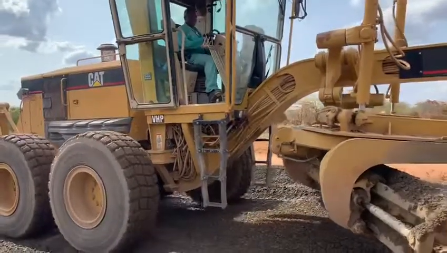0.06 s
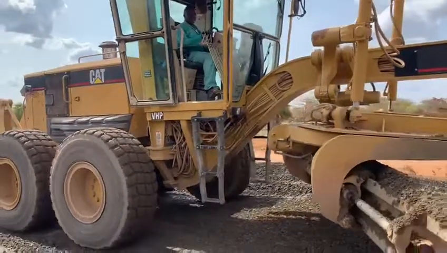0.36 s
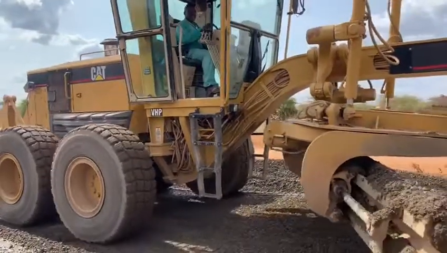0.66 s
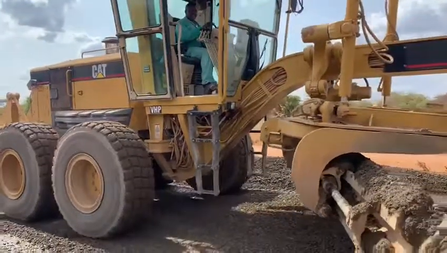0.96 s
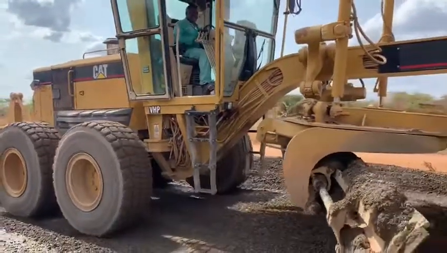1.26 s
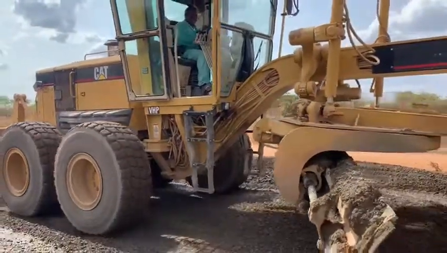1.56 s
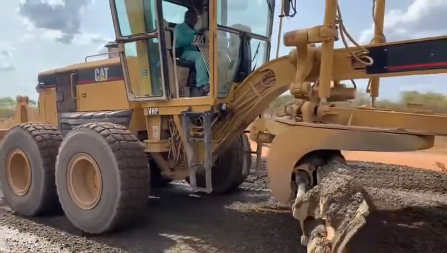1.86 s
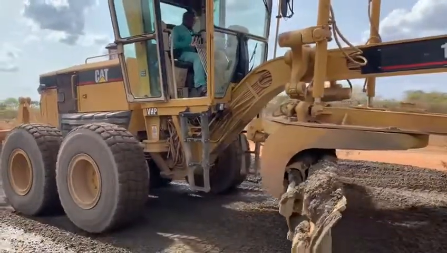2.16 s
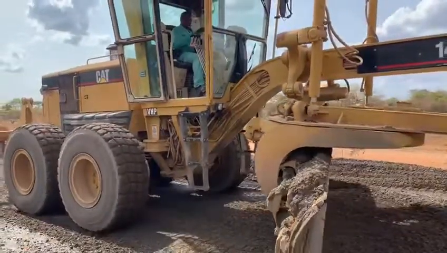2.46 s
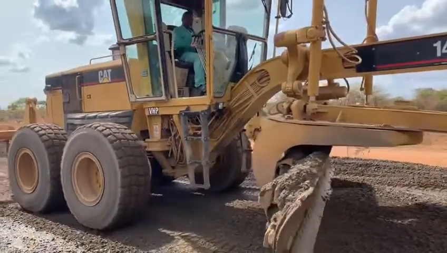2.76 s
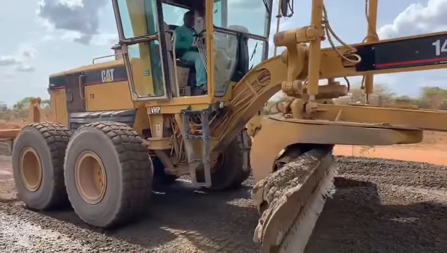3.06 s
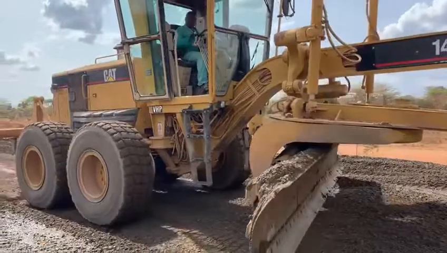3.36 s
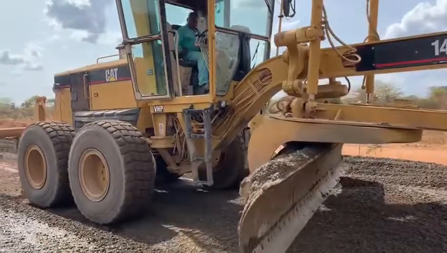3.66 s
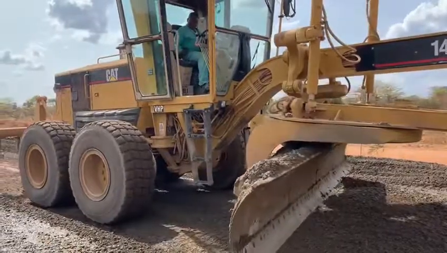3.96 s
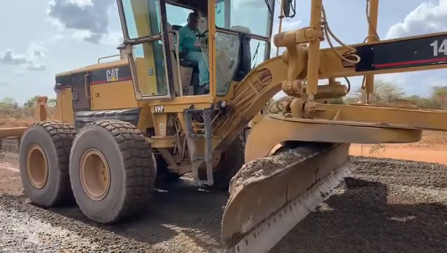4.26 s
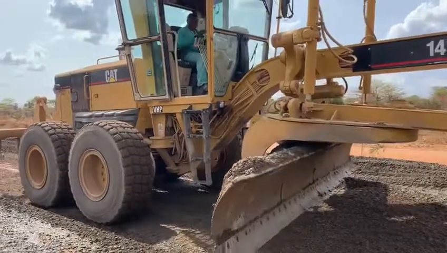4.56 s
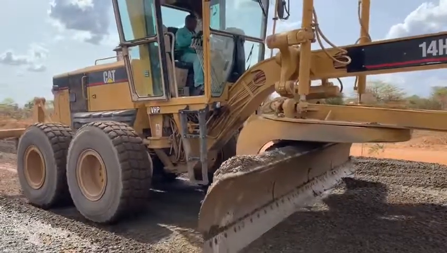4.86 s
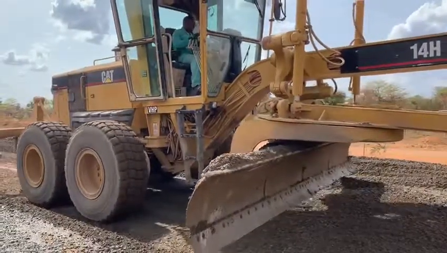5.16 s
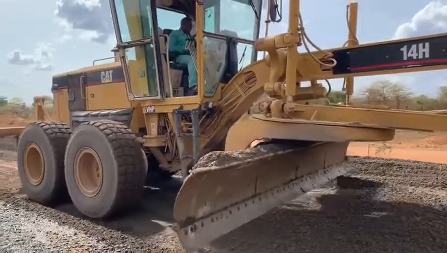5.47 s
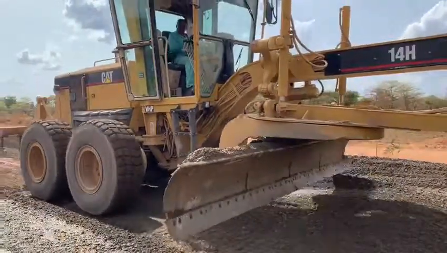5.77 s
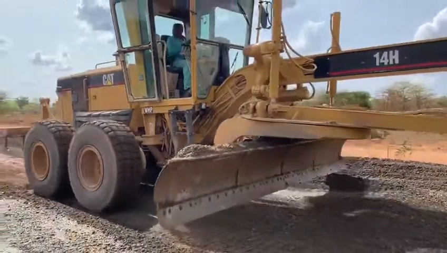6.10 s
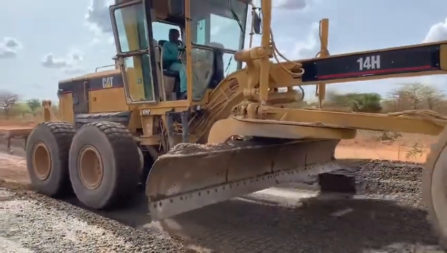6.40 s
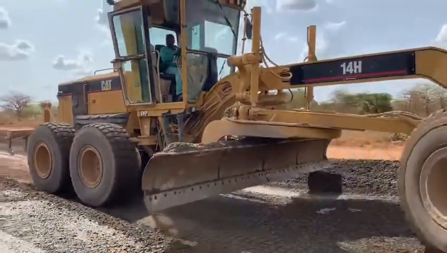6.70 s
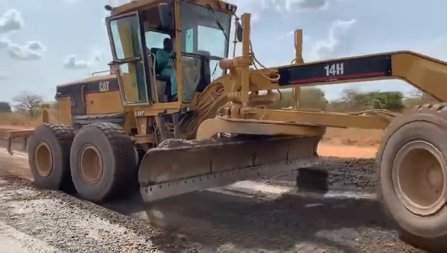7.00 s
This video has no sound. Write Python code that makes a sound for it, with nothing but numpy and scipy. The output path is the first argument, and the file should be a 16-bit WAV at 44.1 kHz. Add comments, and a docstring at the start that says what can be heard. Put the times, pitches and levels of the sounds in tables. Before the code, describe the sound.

Gusty wind thumps the microphone while a grader passes close by, its diesel clattering and gears whining over crunching gravel.

```python
"""A motor grader passes close by, pushing gravel with its blade in gusty open air.
From the start, wind buffets the microphone, hydraulic valves hiss and stones grind along the blade.
The six-cylinder diesel sags as the blade bites, recovers by 1.3 s and drones and clatters under load.
Gears whine on and off as the growl swells; after 4.5 s stones squeak on steel and the whine turns rough
and fainter, fading by 5.35 s. Then the engine speeds up, more grit pours off and the wind eases."""
import sys
import numpy as np
from scipy import signal
from scipy.fft import rfft, irfft, next_fast_len
from scipy.io import wavfile

SR = 44100
rng = np.random.default_rng(int(sys.argv[2]) if len(sys.argv) > 2 else 0)


def master_out(mix):
    """Clip the mix to full scale and print it as 16-bit PCM to the path in sys.argv[1]."""
    frames = np.transpose(np.atleast_2d(mix))
    ceiling = np.clip(frames, -1, 1)
    pcm = np.round(ceiling * 32767).astype(np.int16)
    wavfile.write(sys.argv[1], SR, pcm)


N = 319284
TIME = np.arange(N) / SR


def from_db(db):
    """Decibels to gain."""
    return 10 ** (np.asarray(db) / 20)


def unit_rms(x):
    """Scale to rms 1."""
    return x / np.sqrt(np.mean(x ** 2) + 1e-20)


def in_time(rows):
    """Breakpoints to a value per sample."""
    return np.interp(TIME, *np.transpose(rows))


def at_hz(points, hz):
    """Read a spectrum on a log-frequency axis."""
    freq_hz, value = np.transpose(points)
    return np.interp(np.log(np.maximum(hz, 1)), np.log(freq_hz), value)


def swell(start_s, end_s):
    """Rounded rise and fall, peak 1."""
    along = np.clip((TIME - start_s) / (end_s - start_s), 0, 1)
    return np.sqrt(4 * along * (1 - along))


def drift(corner_hz):
    """Low-passed random wander, rms 1."""
    coarse_s = TIME[::32]
    pole = np.exp(-2 * np.pi * corner_hz * coarse_s[1])
    slow = signal.lfilter([1], [1, -2 * pole, pole * pole], rng.standard_normal(2 * len(coarse_s)))
    return np.interp(TIME, coarse_s, unit_rms(slow[len(coarse_s):]))


def tone(cycles):
    """Sine from a running cycle count."""
    return np.sin((2 * np.pi * (cycles % 1)).astype(np.float32))


def shaped(x, gain_at):
    """Filter by gain_at(hz)."""
    size = next_fast_len(N + 4096)
    hz = np.arange(size // 2 + 1) * SR / size
    return irfft(rfft(x, size) * gain_at(hz), size)[..., :N]


def coloured(x, spectrum):
    """Apply a spectrum, rms 1."""
    return unit_rms(shaped(x, lambda hz: from_db(at_hz(spectrum, hz))))


# Easing breeze: time_s, level_db
BREEZE = [(0, -22.5), (1.1, -24.5), (2.4, -26), (3.0, -24), (3.4, -23.5), (4.3, -22.5), (4.7, -25.5),
          (7.24, -28)]
# Gusts: peak_s, half_length_s, level_db
GUSTS = [(0.023, 0.17, -16), (0.48, 0.055, -21.5), (0.605, 0.088, -22), (0.84, 0.3, -19.5),
         (1.038, 0.2, -20.5), (1.31, 0.055, -19.5), (1.558, 0.15, -18.5), (1.968, 0.18, -22),
         (2.135, 0.081, -21.5), (2.277, 0.11, -26), (2.41, 0.31, -24), (2.835, 0.1, -24),
         (3.503, 0.57, -25), (3.93, 0.42, -22.5), (4.29, 0.22, -19), (5.002, 0.22, -26.5),
         (5.42, 0.27, -21.5), (5.757, 0.21, -22), (6.255, 0.2, -26), (6.795, 0.15, -26),
         (7.115, 0.37, -26.5)]

def wind_level_db():
    """Bell-shaped gusts add their power to the breeze."""
    power = from_db(in_time(BREEZE)) ** 2
    for peak_s, half_length_s, level_db in GUSTS:
        bell = np.cos(np.pi / 2 * np.clip((TIME - peak_s) / half_length_s, -1, 1)) ** 2
        power = power + (from_db(level_db) * bell) ** 2
    return 10 * np.log10(power)


# Wind slap spectrum: freq_hz, gain_db
SLAP_SPECTRUM = [(25, -13), (50, -2.5), (85, 3.5), (130, -1), (190, -1.5), (270, -5.5), (420, -11.5),
                 (800, -19.5), (2000, -74)]
# Wind rumble spectrum: freq_hz, gain_db
RUMBLE_SPECTRUM = [(12, -31), (24, -9), (36, -4), (50, -4.5), (80, -4.5), (120, -13.5), (300, -32),
                   (1000, -88)]

def wind(lump_db, lump_hz, rumble_db, rumble_follow, side_db):
    """Gusts slap the microphone ports in quick lumps over a steadier rumble of large eddies."""
    gust_db = wind_level_db()
    lumps = from_db(lump_db * np.clip(drift(lump_hz), -2, 2))
    slaps = from_db(gust_db) * coloured(lumps * rng.standard_normal((2, N)), SLAP_SPECTRUM)
    rumble_gain = from_db(rumble_db + rumble_follow * (gust_db - gust_db.mean()))
    mid, side = slaps + rumble_gain * coloured(rng.standard_normal((2, N)), RUMBLE_SPECTRUM)
    return mid + from_db(side_db) * side * [[1], [-1]]


# Eddy bursts: start_s, peak_db, ring_hz
EDDY_POPS = [(.014, -13, 300), (.028, -16, 240), (.069, -6, 144), (.417, -10, 279), (.497, -3.5, 141),
             (0.5997, -10.5, 850), (0.6018, -2.5, 534), (0.6029, -10, 170), (0.612, -10, 150),
             (0.642, -10, 151), (.672, -8.5, 200), (0.783, -6.5, 182), (.926, -10, 330), (1.024, -14, 520),
             (1.067, -10.5, 420), (1.173, -13.5, 560), (1.451, -5.5, 139), (1.5133, -5.5, 275),
             (1.717, -9.5, 500), (1.72, -9, 115), (1.927, -9.5, 260), (2.004, -7.5, 170), (2.112, -12, 150),
             (2.121, -7, 126), (2.138, -9.5, 140), (2.726, -10.5, 260), (3.305, -10.5, 230),
             (3.901, -9, 292), (3.929, -12, 260), (4.126, -17, 298), (4.2661, -5, 217), (4.29, -7, 270),
             (4.299, -15, 240), (4.317, -11, 310), (4.331, -17, 390), (4.363, -9.5, 161),
             (5.845, -10.5, 310), (6.175, -6.5, 395), (6.177, -15, 170)]

def eddy_pops(width_cycles):
    """An eddy bursts on the microphone: sudden suction that swings back and dies in a cycle or two."""
    out = np.zeros(N)
    for start_s, peak_db, ring_hz in EDDY_POPS:
        cycles = np.arange(SR // 10) * ring_hz / SR
        swing = np.sin(2 * np.pi * cycles) * cycles * np.exp(-2 * cycles / width_cycles)
        at = int(start_s * SR)
        out[at:at + len(swing)] -= from_db(peak_db) * swing / np.abs(swing).max()
    return out


# Echoes off road, blade and frame: delay_s, gain_db
ECHOES = [(.0019, -14), (.0053, -13), (.0087, -13), (.0143, -12), (.023, -11), (.034, -11)]

def reflected(x, sway):
    """Echo paths shift as the machine moves, combing the sound with drifting ripples; rms 1."""
    out = x
    for delay_s, gain_db in ECHOES:
        late_s = TIME - delay_s * (1 + sway * drift(0.402))
        out = out + from_db(gain_db) * np.array([np.interp(late_s, TIME, channel) for channel in x])
    return unit_rms(out)


# Oil spurts: open_s, close_s, level_db
SPURTS = [(0, 0.024, -33), (0.14, 0.26, -32.5), (0.45, 0.615, -33.5), (0.54, 0.585, -38),
          (0.73, 1.436, -38), (0.837, 0.9, -32.5), (0.99, 1.06, -32.5), (1.167, 1.246, -37),
          (1.84, 1.896, -38), (2.193, 2.422, -39), (2.418, 2.8, -43.5), (2.89, 3.288, -43),
          (3.42, 3.48, -41), (5.21, 5.238, -44), (5.65, 7.24, -51)]
# Oil jet spectrum: freq_hz, gain_db
HISS_SPECTRUM = [(2500, -25), (4600, -3), (6200, -10), (7500, -5), (8000, 0), (8550, 1), (9000, -3),
                 (10000, -6), (11000, -6)]

def valve_hiss(idle_db, rise_s, fall_s, flutter_db):
    """Oil jets through narrow openings; each spurt rises, holds and dies over the idle flow."""
    power = from_db(idle_db) ** 2
    for open_s, close_s, level_db in SPURTS:
        rise = 1 - np.exp(-np.maximum(TIME - open_s, 0) / rise_s)
        fall = np.exp(-np.clip((TIME - close_s) / fall_s, 0, 20))
        power = power + (from_db(level_db) * rise * fall) ** 2
    jet = rng.standard_normal((2, N)) * from_db(flutter_db * drift(25.0))
    return np.sqrt(power) * coloured(jet, HISS_SPECTRUM)


# Valve whistles: start_s, end_s, level_db
WHISTLES = [(.62, .98, -34.5), (1.7, 2.0, -38.5), (3.55, 4.2, -40.5), (4.6, 5.0, -43), (6.0, 6.2, -44),
            (6.9, 7.24, -37.5)]

def valve_whistle(pitch_hz, waver_hz, ramp_s):
    """A valve sings at one slightly unsteady pitch while a lever is held."""
    level = 0
    for start_s, end_s, level_db in WHISTLES:
        inside_s = np.minimum(TIME - start_s, end_s - TIME)
        level = level + from_db(level_db) * np.clip(inside_s / ramp_s + .5, 0, 1)
    return level * np.sqrt(2) * tone(np.cumsum(pitch_hz + waver_hz * drift(25.0)) / SR)


# Stone squeaks: start_s, length_s, start_hz, end_hz, level_db, rough_hz
SQUEAKS = [(4.398, .1, 7170, 7220, -38, 25), (4.583, .022, 8620, 8680, -35.5, 100),
           (4.605, .065, 8780, 9150, -43, 240), (4.76, .075, 6900, 7300, -44, 130),
           (4.845, .07, 8550, 9200, -46, 260), (5.21, .036, 8200, 8500, -42, 380)]

def stone_squeaks():
    """Stones rub on steel in short rising squeals, some clean, some rough."""
    out, jitter = 0, drift(223.6)
    for start_s, length_s, start_hz, end_hz, level_db, rough_hz in SQUEAKS:
        along = np.clip((TIME - start_s) / length_s, 0, 1)
        pitch_hz = start_hz + along * (end_hz - start_hz) + rough_hz * jitter
        out = out + from_db(level_db) * swell(start_s, start_s + length_s) * tone(np.cumsum(pitch_hz) / SR)
    return out


# Grit pours: start_s, end_s, level_db
POURS = [(.68, 1.25, -40.5), (1.6, 2.7, -41), (4.596, 4.72, -36.5), (5.7, 7.0, -36.5)]
# Grit spectrum: freq_hz, gain_db
GRIT_SPECTRUM = [(1500, -5), (2900, 1), (4000, -11), (5000, -8), (7000, -26)]

def grit_pours(grain_db):
    """Grit slides off the blade with a grainy rustle."""
    level = sum(from_db(level_db) * swell(start_s, end_s) for start_s, end_s, level_db in POURS)
    grains = rng.standard_normal((2, N)) * from_db(grain_db * drift(140.0))
    return level * coloured(grains, GRIT_SPECTRUM)


# Gravel spectrum: freq_hz, gain_db
GRAVEL_SPECTRUM = [(300, -14), (900, 1), (1500, 2), (2100, 0), (2700, -0.5), (3200, -4), (4000, -7),
                   (4700, -9.5), (5800, -15), (7000, -16), (10500, -19)]

def gravel(band_clicks_per_s, spread_db, clump_db, sand_gain, bands=12):
    """Stones click over a wash of sand; each size has its own band and leaves the blade in clumps."""
    out, edges_hz = 0, np.geomspace(300, 12000, bands + 1)
    for low_hz, high_hz in zip(edges_hz, edges_hz[1:]):
        hits = rng.random((2, N)) < band_clicks_per_s / SR
        strength = from_db(spread_db * np.minimum(rng.exponential(1, hits.sum()), 4))
        clicks = np.zeros((2, N))
        clicks[hits] = strength * rng.choice([-1, 1], hits.sum())
        sand = sand_gain * rng.standard_normal((2, N))
        flow = (unit_rms(clicks) + sand) * from_db(clump_db * drift(26.0))
        band = signal.butter(2, [low_hz, high_hz], "band", fs=SR, output="sos")
        out = out + signal.sosfilt(band, flow)
    return coloured(out, GRAVEL_SPECTRUM)


# Splitting stones: start_s, level_db
CRACKS = [(.745, -27.5), (1.035, -27.5), (1.626, -26.5), (4.61, -30.5), (4.671, -25.5), (5.194, -25),
          (5.678, -28.5)]

def stone_cracks(decay_s):
    """A stone splits under the blade edge in a short, gritty burst."""
    level = sum(from_db(level_db) * (TIME >= start_s) * np.exp(-np.abs(TIME - start_s) / decay_s)
                for start_s, level_db in CRACKS)
    return level * coloured(rng.laplace(size=(2, N)), GRAVEL_SPECTRUM)


# Gear whines: start_s, end_s, level_db
WHINES = [(1.297, 2.0, -37), (2.25, 2.45, -34), (2.592, 2.765, -32), (3.05, 4.47, -32.5), (4.22, 4.44, -39)]

def gear_whine(firings, upper_db, flutter_db):
    """Two gear meshes, locked to the crankshaft, swell and flutter as they take up load."""
    level = sum(from_db(level_db) * swell(start_s, end_s) for start_s, end_s, level_db in WHINES)
    lower = tone(21 * firings) * from_db(flutter_db * drift(22.0))
    upper = tone(48 * firings) * from_db(upper_db + flutter_db * drift(22.0))
    return level * (lower + upper)


# Swelling noise bands: start_s, end_s, pitch_hz, width_hz, level_db
NOISE_BANDS = [(.85, 1.3, 1406, 50, -41), (1.4, 2.0, 1680, 120, -43.5), (1.843, 2.6, 301, 50.3, -31),
               (2.2, 3.5, 1155, 110, -37.5), (2.65, 3.55, 923, 22, -34.5), (2.6, 3.25, 1810, 130, -39.5),
               (3.002, 4.1, 673, 90, -34.5), (3.2, 4.5, 164, 50, -30), (5.1, 7.4, 204, 45, -33.5),
               (3.0, 4.4, 1710, 45, -41.5), (3.05, 4.4, 1195, 60, -38), (3.5, 4.2, 925, 45, -38),
               (4.62, 4.71, 900, 400, -30.5), (4.55, 5.35, 1157, 90, -37), (4.548, 6.3, 748, 50, -36),
               (4.553, 5.5, 298, 59.6, -35), (5.35, 6.0, 1564, 40, -43), (5.89, 7.4, 316, 70, -30.5),
               (6.005, 7.4, 507, 110, -36), (6.1, 6.7, 695, 60, -34), (6.15, 6.6, 827, 70, -35.5),
               (6.4, 6.56, 917, 80, -29.5), (6.6, 7.5, 900, 70.4, -35), (6.55, 7.4, 773, 50, -37),
               (6.692, 6.87, 103, 30, -17), (6.85, 7.4, 120, 35, -24.5)]

def pulsing_bands(firings, knock, decay_cycles):
    """Bands of pulsing noise: engine resonances, rough gear whine, a short scrape, a low wind buffet."""
    out, bursts = 0, 1 + knock * np.exp(-(firings % 1) / decay_cycles)
    for start_s, end_s, pitch_hz, width_hz, level_db in NOISE_BANDS:
        edges_hz = [pitch_hz - width_hz / 2, pitch_hz + width_hz / 2]
        band = signal.butter(2, edges_hz, "band", fs=SR, output="sos")
        noise = unit_rms(signal.sosfilt(band, bursts * rng.standard_normal(N)))
        out = out + from_db(level_db) * swell(start_s, end_s) * unit_rms(noise * bursts)
    return out


# Block response: freq_hz, gain_db
BLOCK_SPECTRUM = [(80, -19), (115, 5), (170, -1), (230, -3), (310, 3.5), (420, -4), (540, -6.5), (680, -1),
                  (900, -3), (1080, -27), (1600, -16.5), (2400, -11)]
# Block growl: time_s, level_db
GROWL = [(0, -47), (2.4, -33), (3.0, -29), (4.35, -34), (4.7, -31.5), (7.24, -28)]

def block_growl(firings, firing_hz, wander_db, jitter_hz):
    """The block radiates whole and, from unequal cylinders, half multiples of the firing rate."""
    out = 0
    for halves in range(3, 64):
        response_db = np.interp(TIME, TIME[::512], at_hz(BLOCK_SPECTRUM, firing_hz[::512] * halves / 2))
        order_db = response_db - 1.9 * (halves % 2) + wander_db * drift(3.4)
        slip_cycles = np.cumsum(jitter_hz * halves * drift(39.7)) / SR
        out = out + from_db(order_db) * tone(firings * halves / 2 + slip_cycles + rng.random())
    return from_db(in_time(GROWL)) * unit_rms(out)


# Clatter spectrum: freq_hz, gain_db
CLATTER_SPECTRUM = [(60, 11.5), (200, -2), (320, 5), (520, -3.5), (690, 5.5), (810, -2), (930, 4),
                    (1060, 1), (1300, 0.5), (1800, -8), (3000, -16.5), (6000, -54), (11000, -53)]

def diesel_clatter(firings, knock, decay_cycles, uneven_db):
    """Each firing knocks a dying noise burst out of the block, over the steady rush of the fan."""
    cylinder_gain = from_db(uneven_db * np.cos(2 * np.pi * np.floor(firings) / 6))
    bursts = 1 + knock * cylinder_gain * np.exp(-(firings % 1) / decay_cycles)
    return coloured(bursts * rng.standard_normal((2, N)), CLATTER_SPECTRUM)


# Exhaust drone: time_s, level_db
DRONE = [(0, -24), (.3, -26), (.56, -18), (.66, -22), (.78, -12), (.9, -16.5), (1.05, -14.5), (1.3, -18.5),
         (1.6, -23), (2.0, -20), (2.75, -18), (2.92, -22), (3.4, -16), (4.0, -23.5), (4.53, -26),
         (4.63, -11), (4.76, -13), (4.92, -20), (5.28, -12.5), (5.5, -12), (5.6, -16.5), (5.9, -12.5),
         (6.3, -10.7), (6.62, -10), (6.85, -15.5), (7.12, -18), (7.24, -28)]

def exhaust(firings, throb_db):
    """The pipe drones at the firing rate and throbs a little."""
    return from_db(in_time(DRONE) - throb_db * drift(11.0)) * tone(firings)


# Left-right likeness: freq_hz, correlation
LIKENESS = [(300, .93), (550, .78), (920, .88), (1300, .68), (1650, .66), (2200, .15), (2480, .7),
            (2730, .92), (2930, .2), (3180, .64), (3400, .25), (3550, .66), (4050, .12), (4550, .42),
            (5400, .42), (6000, .12), (7700, .38), (8200, .6), (8700, .96), (9600, .98), (10250, .5),
            (10650, .9)]
# Left over right level: freq_hz, balance_db
BALANCE = [(300, -0.5), (950, .5), (1300, 3.5), (1800, 2), (2250, 3), (2650, -3.5), (2950, 1), (4500, -0.2),
           (9000, -0.5)]
# Left over right phase: freq_hz, lead_rad
PHASE_LEAD = [(1000, 0), (1450, -.3), (1780, 0), (1960, .6), (2090, 2.7), (2290, .9), (2750, 3.1),
              (2880, 3.5), (3020, 7.1), (3300, 8.8), (3450, 12.5), (3700, 13.2), (4350, 21.9), (4750, 22.8),
              (7200, 21.9), (7700, 20), (8400, 18.9), (9750, 18.8), (10250, 17.9), (10450, 15.9)]

def microphone_pair(diffuse, direct):
    """Scattered sound is partly alike at the two ports, direct sound wholly; level and phase differ."""
    sign = np.array([[1], [-1]])
    mid, side = shaped(diffuse, lambda hz: np.sqrt((1 + sign * at_hz(LIKENESS, hz)) / 2))

    def port_gain(hz):
        return from_db(sign * at_hz(BALANCE, hz) / 2) * np.exp(.5j * sign * at_hz(PHASE_LEAD, hz))
    return shaped(direct + mid + sign * side, port_gain)


# Engine speed, sagging as the blade bites: time_s, firing_hz
ENGINE_SPEED = [(0, 54), (.45, 47), (.6, 43.5), (.78, 42), (.93, 49), (1.1, 54), (1.3, 55.9), (2, 55.9),
                (2.25, 54.6), (2.42, 55), (2.68, 56.5), (3.9, 57.0), (4.3, 56.9), (4.45, 54.8), (4.7, 55.5),
                (5, 53), (5.3, 52.6), (5.8, 54.6), (6.2, 57), (6.42, 57.7), (6.6, 60), (6.85, 61.5),
                (7.1, 65), (7.24, 65)]
# Blade load, as grinding level: time_s, level_db
BLADE_LOAD = [(0, -32.5), (.5, -32), (1.04, -28), (1.35, -30), (2.8, -30), (3.5, -31.5), (4.55, -32),
              (4.61, -29.5), (4.67, -31.5), (4.72, -31), (5.5, -31.5), (5.75, -30), (7.24, -31)]

def scene():
    """Engine, gravel, hydraulics and wind at the microphone."""
    firing_hz, load_db = in_time(ENGINE_SPEED), in_time(BLADE_LOAD)
    firings = np.cumsum(firing_hz * (1 + 0.00203 * drift(19.3))) / SR
    drone = exhaust(firings, throb_db=0.25)
    growl = block_growl(firings, firing_hz, wander_db=4.0, jitter_hz=0.4034)
    bands = pulsing_bands(firings, knock=0.66, decay_cycles=0.22)
    clatter_db = -28.5 + 0.93 * (load_db - load_db.mean())   # louder under load
    clatter = diesel_clatter(firings, knock=1.4, decay_cycles=0.24, uneven_db=2.0)
    clatter = from_db(clatter_db) * reflected(clatter, sway=0.04)
    gears = gear_whine(firings, upper_db=-11.0, flutter_db=2.2)
    stones = gravel(band_clicks_per_s=1500, spread_db=3.0, clump_db=2.5, sand_gain=0.61)
    stones = from_db(load_db) * reflected(stones, sway=0.0356)
    blade = stone_cracks(decay_s=0.017) + grit_pours(grain_db=3.0)
    hiss = valve_hiss(idle_db=-52, rise_s=.02, fall_s=.03, flutter_db=1.5)
    whistle = valve_whistle(pitch_hz=1268, waver_hz=6.3, ramp_s=0.068)
    gusts = wind(lump_db=3.0, lump_hz=44.0, rumble_db=-22.5, rumble_follow=0.31, side_db=-12.0)
    diffuse = clatter + stones + blade + hiss
    direct = drone + growl + bands + gears + stone_squeaks() + whistle
    return microphone_pair(diffuse, direct) + gusts + eddy_pops(width_cycles=0.64)


def record(dry):
    """Round the highest peaks, then cut the top treble."""
    ceiling, cutoff_hz = .9, 10650
    rounded = dry / (1 + (dry / ceiling) ** 8) ** (1 / 8)
    return signal.sosfilt(signal.ellip(10, .2, 90, cutoff_hz, fs=SR, output="sos"), rounded)


dry = scene()
out = record(dry)
master_out(out)
```